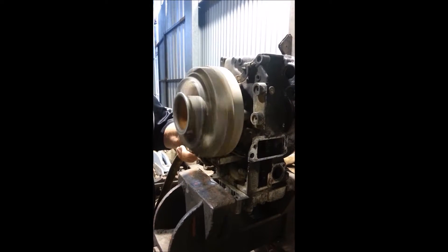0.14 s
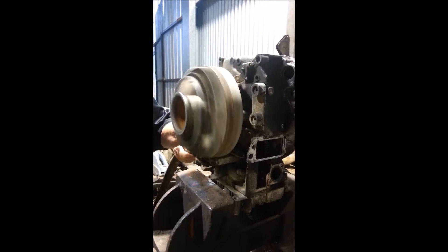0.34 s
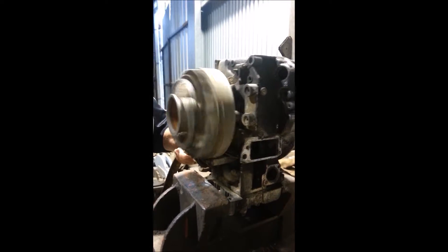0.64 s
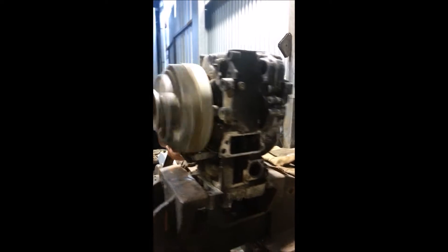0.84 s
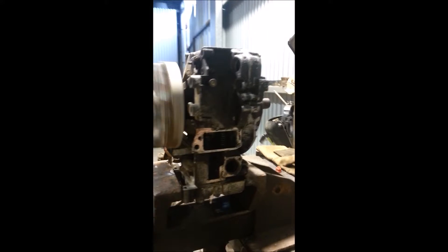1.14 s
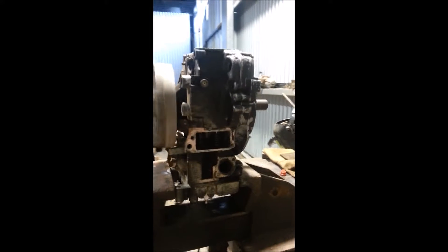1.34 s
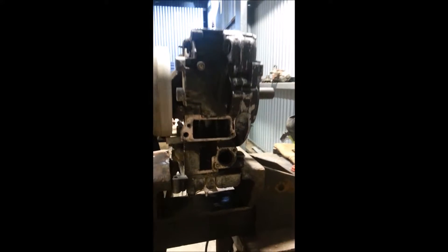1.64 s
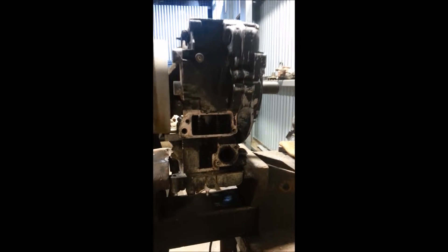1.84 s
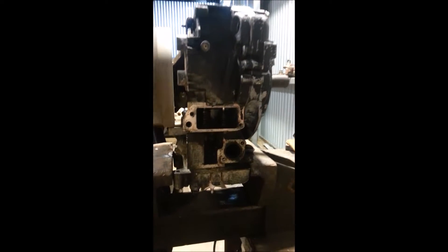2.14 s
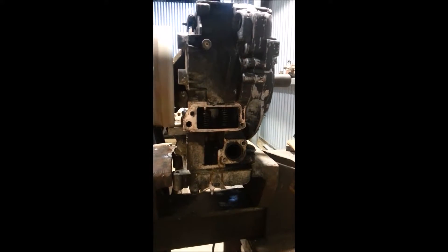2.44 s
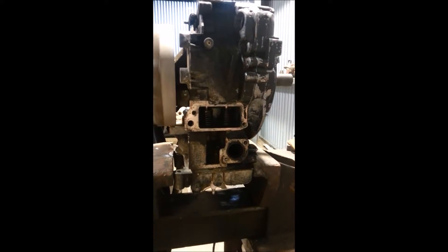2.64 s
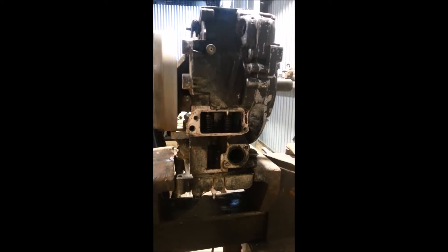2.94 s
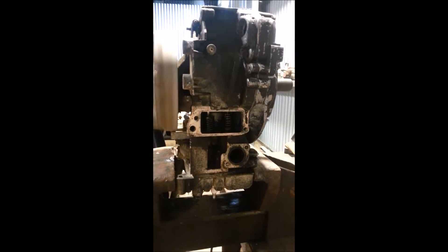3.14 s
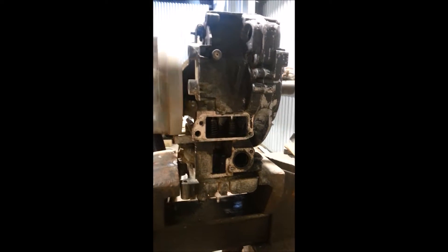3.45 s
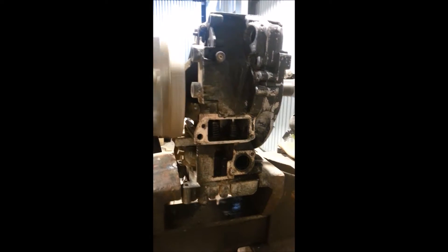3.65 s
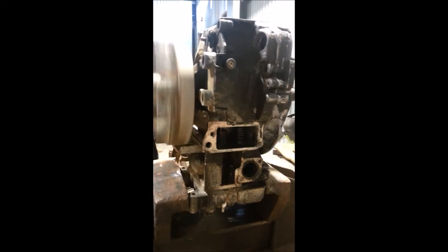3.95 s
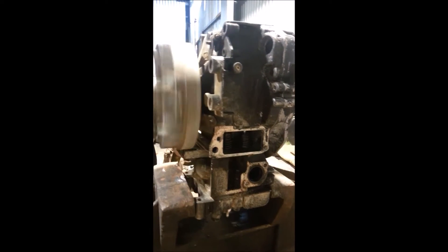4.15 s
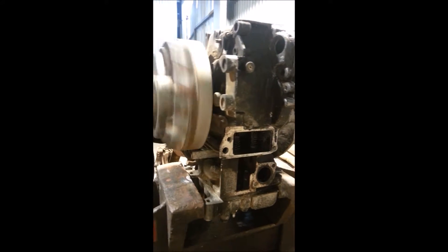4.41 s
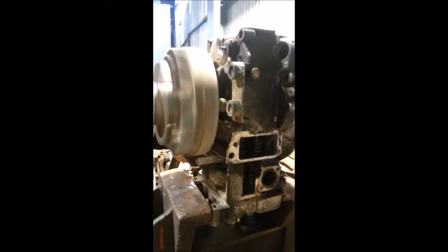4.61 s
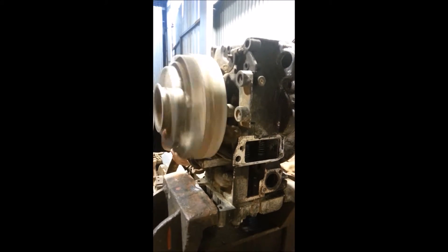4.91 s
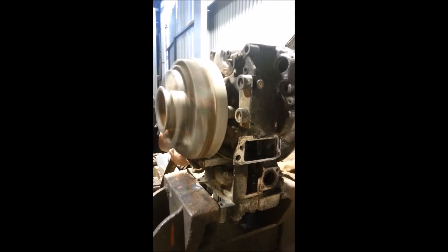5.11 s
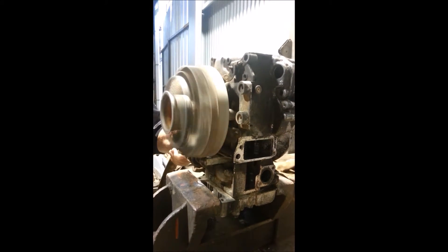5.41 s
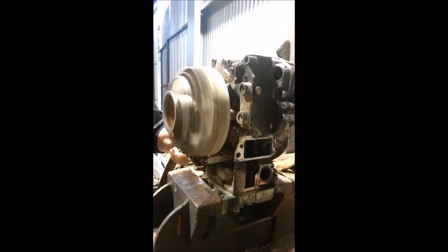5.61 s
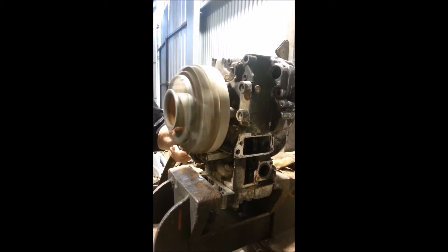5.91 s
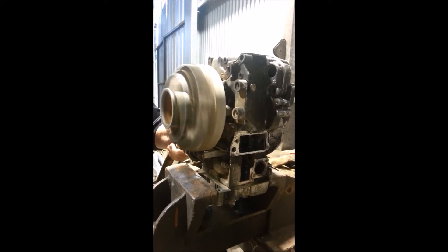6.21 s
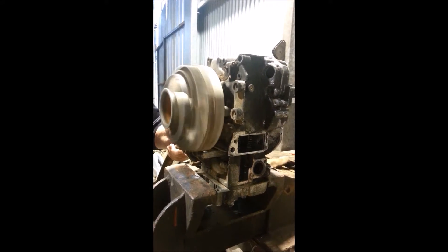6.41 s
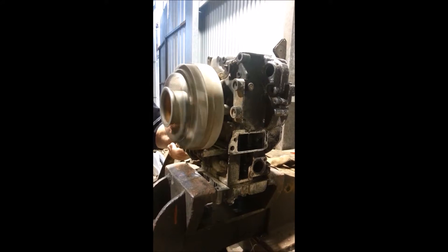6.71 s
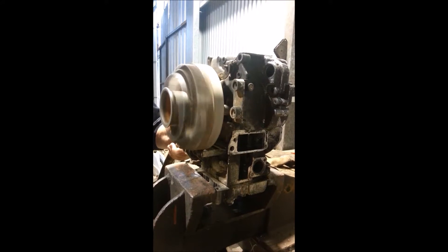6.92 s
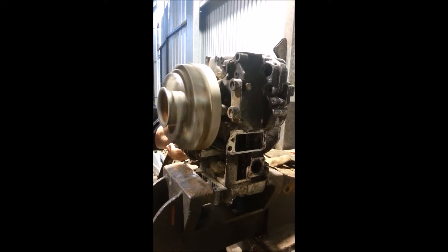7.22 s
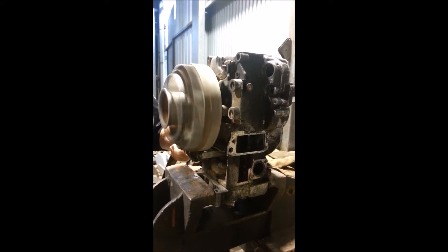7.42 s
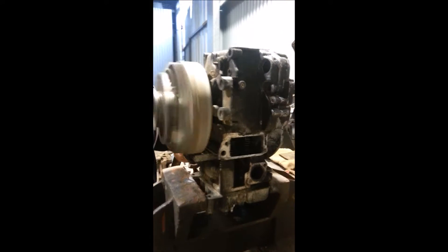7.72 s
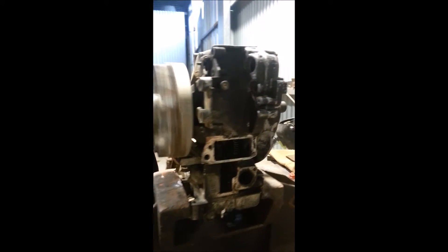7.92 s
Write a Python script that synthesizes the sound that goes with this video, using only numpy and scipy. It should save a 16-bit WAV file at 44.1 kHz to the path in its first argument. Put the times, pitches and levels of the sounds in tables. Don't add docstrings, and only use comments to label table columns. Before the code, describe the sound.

A small engine turned by compressed air runs at constant speed in a tin shed, very close to a hand-held stereo microphone. Throughout, it throws out rapid puffs of air, four unequal ones per cycle and about 4.3 cycles a second, making a brisk rasping chuff. Each puff is a bright turbulent hiss, strongest around 2 to 7 kHz, with a short fuzzy note near 1.8 kHz. A steady leak hisses beneath, more to the right. From 0 to 1 s the puffs are dry and crisp. From about 1.2 s the microphone swings into the stream: low thumps and windy rumble strike it, heavier on the left, with a faint thin singing band, strongest from 2 to 3.6 s. By 4.4 s the buffeting fades; from 5.4 s the chuffing is crisp again, with stray soft pops, continuing unchanged until it cuts off at about 8 s.

```python
import sys
import numpy as np
from scipy import signal
from scipy.fft import rfft, irfft
from scipy.io import wavfile
from scipy.ndimage import uniform_filter1d

SR = 44100
rng = np.random.default_rng(int(sys.argv[2]) if len(sys.argv) > 2 else 0)


def ratio(d):
    e = np.asarray(d, float) / 20
    return 10 ** e


def store_pcm(level_fs):
    pcm = np.round(np.clip(level_fs, -1, 1) * 32767).astype(np.int16)
    wavfile.write(sys.argv[1], SR, np.atleast_2d(pcm).T)


N = 355446
TIME = np.arange(N) / SR
HISS, WHISTLE, RUSH, NOTE, OUTFLOW = range(5)


def evened(x):
    return x / np.sqrt(np.mean(x ** 2) + 1e-20)


def curve(table, at, column=1):
    table = np.array(table)
    return np.interp(at, table[:, 0], table[:, column])


def by_hz(table, column=1):
    table = np.array(table)
    bins = np.fft.rfftfreq(N, 1 / SR)
    return np.interp(np.log(bins + 1), np.log(table[:, 0]), table[:, column])


def wobble(hz, channels=1):
    steps = round(N / SR * hz * 2) + 2
    return evened(signal.resample(rng.standard_normal((channels, steps)), N, axis=1))


def resonate(x, hz, width):
    turn = np.exp(2j * np.pi * np.cumsum(hz * np.ones(N)) / SR)
    r = np.exp(-np.pi * width / SR)
    return 2 * (turn * signal.lfilter([1 - r], [1, -r], x / turn)).real


def patchy(x, db, size):
    z = signal.stft(x, SR, nperseg=512)[2]
    field = uniform_filter1d(rng.standard_normal(z.shape[1:]), size, axis=0)
    field = uniform_filter1d(field, size=8, axis=1)
    return signal.istft(z * ratio(db * evened(field)), SR, nperseg=512)[1][:, :N]


# (time [s], cycles of two turns completed [1])
CRANK_TIMING = [(-.0099, 0), (1.1648, 5), (2.3347, 10), (3.5011, 15), (4.6651, 20), (5.8281, 25),
                (6.9912, 30), (8.1556, 35)]


def crank_angle():
    return curve(CRANK_TIMING, TIME) + .003 * wobble(5)[0]


# (time [s], 0 beside the flywheel to 1 facing the exhaust opening [1])
MICROPHONE_FACING = [
    (0, 0.091),
    (.7, 0.0066),
    (1.15, 0.19),
    (2, 0.85),
    (3.6, 0.81),
    (4.4, .24),
    (5.4, 0.0064),
    (6.5, 0),
    (8.06, 0.086),
]


def facing():
    return np.clip(curve(MICROPHONE_FACING, TIME), 0, 1)


ANGLE = crank_angle()
FRONT = facing()

VALVE_OPENINGS = [
    (-.004, 0.018, 0.89, 0.084),
    (-.015, 0.056, 0.027, 0.066),
    (.251, 0.051, 0.016, 0.043),
    (.264, .1, 0.035, .085),
    (.364, 0.088, 0.14, .016),
    (.57, 0.037, .016, .012),
    (.722, .094, 0.062, 0.035),
]
# (fine hiss [dB], whistle [dB], coarse rush [dB], port note [dB],
# outflow at the microphone [dB])
OPENING_STRENGTHS = [(-11.5, -0.5, -7.5, -11.5, -9.5), (-3, -12, -4.5, -8, -18),
                     (-3.5, -9.5, -8.5, -5.5, -8), (-7, -12, -4, -10.5, -7.5), (-14, -26, -21.5, -5.5, -37),
                     (-9.5, -7, -5.5, -11.5, -30), (-4, 0, -2, -5.5, -4)]
SHUT_DB = (-14.5, -12, -12, -17.5, -18)
SAG = (0.16, 0.67, 0.5, 0.49, 0.34)
LAG = (0, -.005, -.003, .019, .01)


def valves(layer):
    share = np.arange(1000) / 1000
    flow = ratio(SHUT_DB[layer])
    for (opens, *spans), strength in zip(VALVE_OPENINGS, OPENING_STRENGTHS):
        since = (share - opens - LAG[layer] * (opens > 0)) % 1
        opening = np.interp(since, np.cumsum([0, *spans]), [0, 1, 1 - SAG[layer], 0])
        flow = flow + ratio(strength[layer]) * opening
    return np.interp(ANGLE, share, 20 * np.log10(flow / flow.max()), period=1)


# (frequency [Hz], share alike beside [1], lag of the left port beside [rad],
# share alike in front [1], lag of the left port in front [rad])
PORT_COHERENCE = [(200, .1, 0, .1, 0), (900, .4, 0, .3, 0), (1550, .74, 0, .7, 0), (2240, .7, 1.6, .6, 1.9),
                  (2900, .65, 1.6, .6, 2.8), (3950, .75, 4.8, .65, 6.3), (4700, .7, 5.8, .4, 8),
                  (5600, .8, 6.6, .65, 7), (7300, .4, 4.8, .75, 6.3), (8800, .35, 5.1, .45, 9.4),
                  (10300, .4, 10, .3, 12.5), (14000, .3, 11, .3, 19)]


def pair(column=1):
    shared, own = rfft(rng.standard_normal((2, N)))
    alike = by_hz(PORT_COHERENCE, column)
    late = np.exp(-1j * by_hz(PORT_COHERENCE, column + 1))
    return np.array([shared * late, alike * shared + np.sqrt(1 - alike ** 2) * own])


def narrow_band(hz, width):
    once = resonate(irfft(pair(column=3), N), hz, width)
    return evened(resonate(once, hz, 2 * width))


# (frequency [Hz], left from the side [dB], right from the side [dB],
# left from the front [dB], right from the front [dB])
JET_COLOUR = [(250.0, -28.7, -36, -27.5, -32), (900.0, -14, -12.5, -11.5, -11),
              (1420, -5, -9.5, -3.5, -10.5), (2330, -3, -2.5, -2.0, -3.5), (3000, -0.7, -3, -7.4, -4.5),
              (3820, 1.4, -0.9, -0.3, -1.0), (4600.0, -2.5, -3.5, -7.5, -4.5), (5300, -1.5, 0, -3, 1.5),
              (6420, -8.9, 0.1, -10, 0), (7370, -9.5, -5, -7, -3), (9240, -10.3, -9, -10, -7),
              (11260, -9.5, -8.5, -9.5, -8), (12300, -13, -11, -14.8, -8.5),
              (14100, -13.5, -10, -10.5, -8.5)]
JET_DB, SPLIT_HZ = -7, (5630, 6550)
SHARPNESS = [(1.15, 0.67), (1.15, 3.8), (1.15, 0.81)]


def jets():
    hz, out = np.fft.rfftfreq(N, 1 / SR), 0
    low, below_top = (1 / (1 + (hz / edge) ** 12) for edge in SPLIT_HZ)
    side, front = (pair(column=k) * ratio(np.array([by_hz(JET_COLOUR, k), by_hz(JET_COLOUR, k + 1)]))
                   for k in (1, 3))
    flutter_db = 1.01 * wobble(60) + .5 * wobble(11)
    ranges = (low, below_top - low, 1 - below_top)
    for share, layer, depth in zip(ranges, (RUSH, WHISTLE, HISS), SHARPNESS):
        coloured = np.sqrt(1 - FRONT) * irfft(side * share, N) + np.sqrt(FRONT) * irfft(front * share, N)
        opening = ratio(np.outer(depth, valves(layer)))
        opening = opening / np.sqrt(np.mean(opening ** 2, axis=1, keepdims=True))
        out = out + coloured * ratio(flutter_db) * opening
    return ratio(JET_DB) * evened(out)


def leak():
    hiss = narrow_band(hz=5600, width=1000)
    level_db = np.array([[-85], [-18.5]]) + 10 * FRONT
    shut_db = 2 * np.minimum(valves(WHISTLE) + 8, 0) + .3 * valves(WHISTLE)
    return hiss * ratio(level_db + shut_db)


# (frequency [Hz], width [Hz], left [dB], right [dB])
PORT_RESONANCES = [
    (1756, 260, -12.5, -22),
    (1962, 220, -20, -29),
]


def port_note():
    out = np.zeros((2, N))
    for hz, width, left_db, right_db in PORT_RESONANCES:
        drift = hz * (1 + .012 * wobble(12)[0])
        ring = resonate(resonate(irfft(pair(), N), drift, width), drift, 2 * width)
        out += ratio(np.array([[left_db], [right_db]]) + 1.2 * wobble(9)) * evened(ring)
    return out * ratio(1.65 * valves(NOTE) + 5.5 + 1.13 * wobble(50))


STRAY_AT = (.06, .33, .6, .83)
STRAY_CHANCE = (.2, .45)
STRAY_FRONT_DB, STRAY_SPREAD_DB = 7.5, 7.5
STRAY_HZ, STRAY_S = (290, 430), (0.016, .034)


def strays(db):
    times, cycles = np.transpose(CRANK_TIMING)
    at = (np.arange(cycles[-1])[:, None] + STRAY_AT).ravel()
    luck, shift, size, pitch, length = rng.random((len(at), 5)).T
    s = np.interp(at + .08 * (shift - .5), cycles, times)
    front = np.interp(s, TIME, FRONT)
    front_db = front * (STRAY_FRONT_DB + np.interp(s, TIME, valves(OUTFLOW)))
    level_db = db + front_db + STRAY_SPREAD_DB * (size - .5)
    rows = np.transpose([s, level_db, np.interp(pitch, (0, 1), STRAY_HZ), np.interp(length, (0, 1), STRAY_S)])
    thrown = luck < STRAY_CHANCE[0] + STRAY_CHANCE[1] * front
    return rows[thrown & (s > 0) & (s < N / SR)]


def pops(table):
    out, t = np.zeros(N + SR), np.arange(-2000, 2000) / SR
    for (s, db, hz, length), noise in zip(table, rng.standard_normal((len(table), len(t)))):
        swell = np.exp(-(t / (0.82 * length)) ** 2)
        band = signal.butter(2, [0.47 * hz, 2.6 * hz], "band", fs=SR)
        ragged = evened(signal.lfilter(*band, noise))
        wave = np.cos(2 * np.pi * hz * t + np.pi * noise[0]) + 1.6 * ragged
        wave += 0.2 * np.cos(2 * np.pi * 0.51 * hz * t + np.pi * noise[1])
        out[round(s * SR):][:len(t)] += ratio(db - 6.0) * swell * wave
    return out[len(t) // 2:][:N]


# (frequency [Hz], density in the stream [dB per Hz], density beside it [dB per Hz])
RUMBLE_COLOUR = [(25, -20, -34), (60, 2, -30), (110, 0.5, -36), (260, 0.5, -23), (380, -2, -7.5),
                 (770, -8, -4.5), (1610, -42, -16)]
# (time [s], peak level [dB], pitch [Hz], length [s])
LEFT_LUMPS = [(1.244, -21, 373, 0.03), (1.465, -17, 295, .016), (1.495, -12.5, 320, 0.0097),
              (1.594, -11.5, 320, 0.015), (1.708, -16, 230, 0.03), (1.82, -13, 393, 0.023),
              (1.933, -21, 306, .029), (1.962, -11, 378, 0.027), (2.058, -25, 307, 0.037),
              (2.193, -14, 267, 0.0055), (2.304, -10.5, 342.4, 0.015), (2.365, -15, 260, .008),
              (2.424, -11, 223, .022), (2.508, -6, 346, .005), (2.604, -19.5, 144.8, .015),
              (2.664, -14, 338, .014), (2.777, -15, 310, 0.024), (2.885, -8, 303, 0.0051),
              (2.981, -16, 228, .009), (3.001, -15, 380, .01), (3.065, -12, 367, 0.016),
              (3.211, -13, 347, 0.014), (3.235, -8, 327, 0.0064), (3.33, -18, 287, 0.017),
              (3.438, -17, 271, 0.012), (3.574, -21, 307.5, 0.052), (3.826, -18, 282, .006),
              (3.935, -19, 286.6, .02), (5.318, -13, 305, 0.0077), (5.673, -21, 334, 0.018)]
# (time [s], peak level [dB], pitch [Hz], length [s])
RIGHT_LUMPS = [(1.357, -19, 403, 0.0086), (1.648, -22, 340, 0.0063), (1.706, -17, 318, 0.013),
               (1.829, -14.5, 312, 0.008), (1.946, -15, 290, .007), (2.298, -15, 282, .016),
               (2.353, -20, 310, .009), (2.397, -19, 290, .009), (2.583, -18, 320, .011),
               (2.643, -16, 300, 0.011), (2.762, -16, 260, .013), (2.872, -14, 365, 0.015),
               (2.994, -22, 320, .018), (3.049, -19, 340, .009), (3.12, -19, 352, 0.013),
               (3.357, -21, 340, 0.024), (3.571, -16, 360, .008), (4.043, -19, 319.9, 0.018),
               (4.159, -20, 370, 0.0073), (4.446, -17, 321.8, 0.0072), (4.678, -19, 292, .009),
               (7.233, -19, 350, 0.0048), (7.705, -26, 313, 0.016)]


def buffet():
    noise = rfft(rng.standard_normal((2, N)))
    deep, thin = (irfft(noise * ratio(by_hz(RUMBLE_COLOUR, k)), N) for k in (1, 2))
    stream = FRONT ** 3 * ratio(np.array([[-1.5], [-9]]) + 1.1 * valves(OUTFLOW)) * deep
    beside_gain = (1 - FRONT ** 2) * ratio(np.array([[-3], [-7]]) + 1.4 * valves(RUSH))
    beside = beside_gain * patchy(thin, db=4.0, size=1)
    rumble = (stream + beside) / np.std(deep) * ratio(3.9 * wobble(25, channels=2) - 20.0)
    left = pops(LEFT_LUMPS) + pops(strays(db=-25.5))
    right = pops(RIGHT_LUMPS) + pops(strays(db=-27.5))
    return rumble + np.array([left, right])


def edge_tone():
    band = narrow_band(hz=7350, width=350)
    level_db = np.array([[-30], [-40]]) - 25 * (1 - FRONT)
    return band * ratio(level_db + 0.95 * valves(HISS))


def scene():
    return patchy(jets() + leak(), db=1.5, size=5) + port_note() + buffet() + edge_tone()


def low_pass(x):
    return signal.sosfilt(signal.butter(12, 14720, fs=SR, output="sos"), x)


def record(dry):
    clipped = np.clip(1.4 * np.tanh(dry / 1.4), -.97, .97)
    hz, _, z = signal.stft(clipped, SR, nperseg=2048)
    wind_cut = 1 / np.sqrt(1 + (75 / (hz + 1)) ** 4)
    band_limit = 1 / (1 + np.exp((hz - 14600) / 60))
    power = abs(uniform_filter1d(abs(z) ** 2, size=3, axis=1))
    floor = ratio(-47.5) / (1 + (hz / 560) ** 4)[:, None]
    gated = z * np.maximum(power ** 3 / (power ** 3 + floor ** 6), ratio(-15))
    both = np.array([gated[0] + gated[1], gated[0] - gated[1]]) / 2
    narrow = uniform_filter1d(abs(both) ** 2, size=6, axis=1)
    wide = uniform_filter1d(narrow.mean(0), size=110, axis=0)
    threshold = wide * ratio(2 * -8.5 + 3 * (hz > 8500)[:, None])
    weak = (narrow < threshold) & (hz > 2500)[:, None]
    both = both * np.where(weak, ratio(-16), 1)
    ports = np.array([both[0] + both[1], both[0] - both[1]])
    filtered = signal.istft(ports * (wind_cut * band_limit)[:, None], SR, nperseg=2048)[1][:, :N]
    low_noise = ratio(-61) * wobble(45, channels=2)
    return low_pass(filtered + low_noise)


dry = scene()
out = record(dry)
store_pcm(out)
```